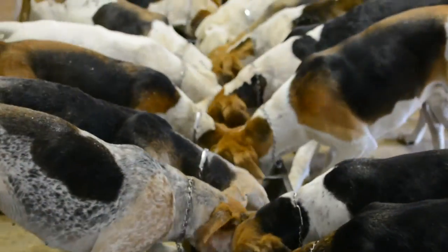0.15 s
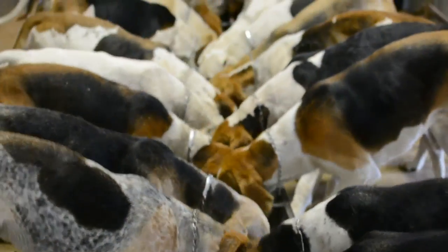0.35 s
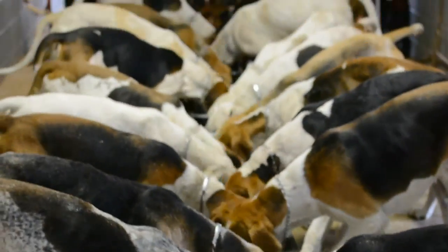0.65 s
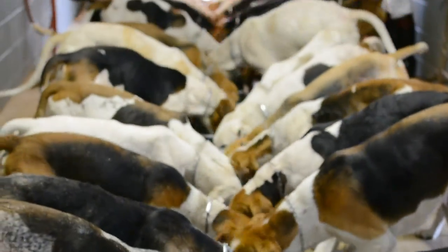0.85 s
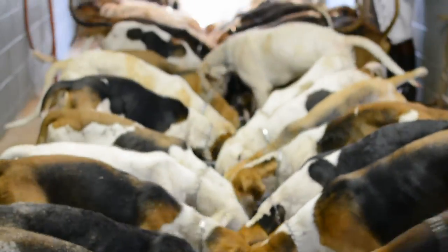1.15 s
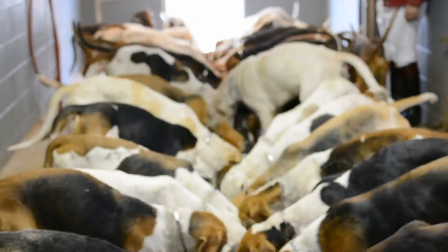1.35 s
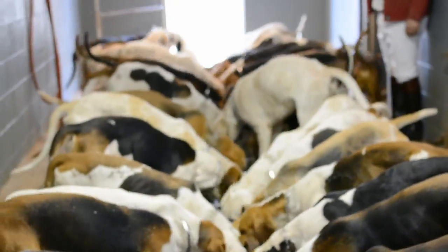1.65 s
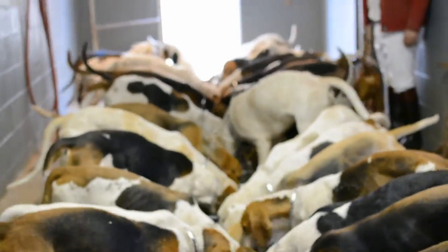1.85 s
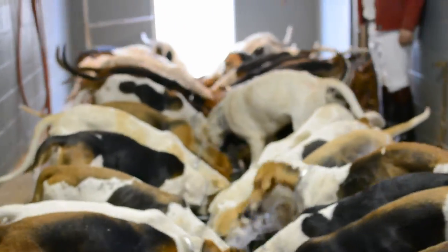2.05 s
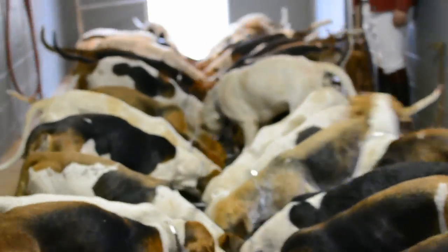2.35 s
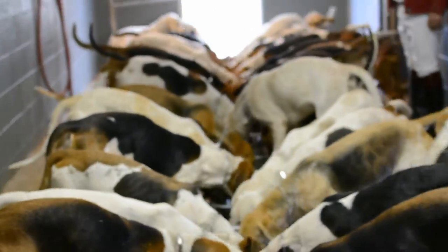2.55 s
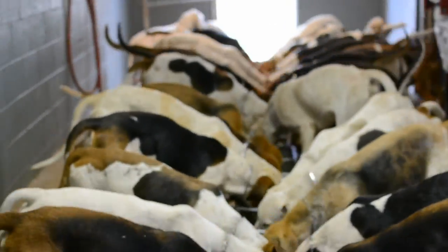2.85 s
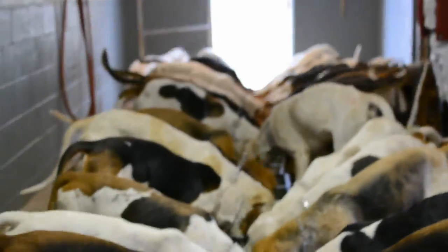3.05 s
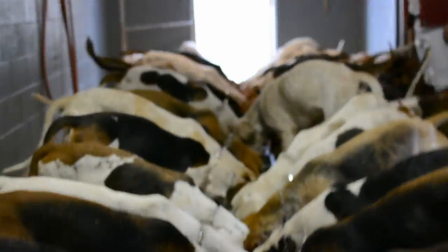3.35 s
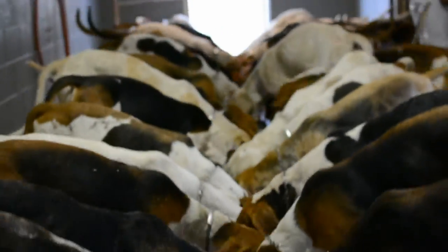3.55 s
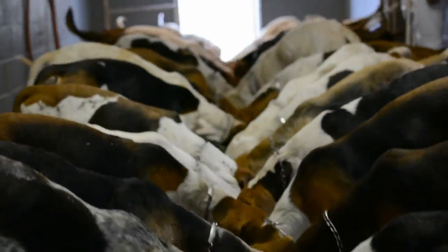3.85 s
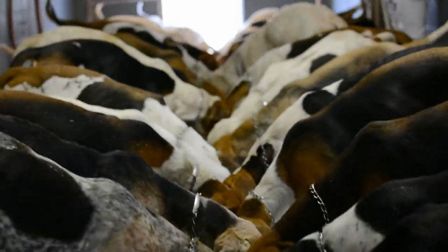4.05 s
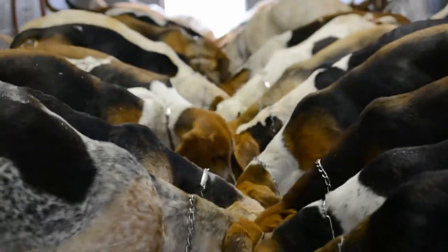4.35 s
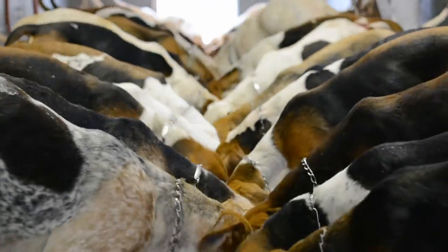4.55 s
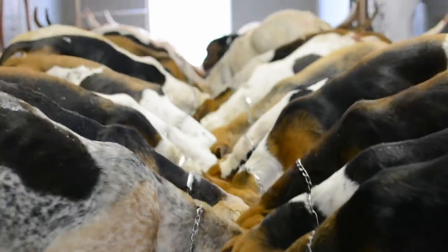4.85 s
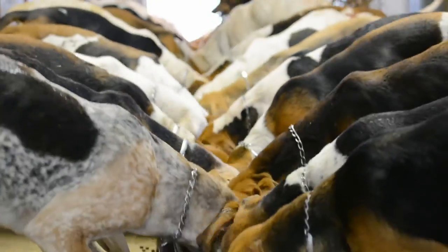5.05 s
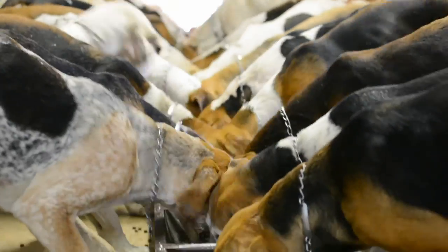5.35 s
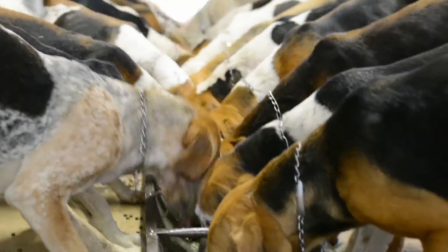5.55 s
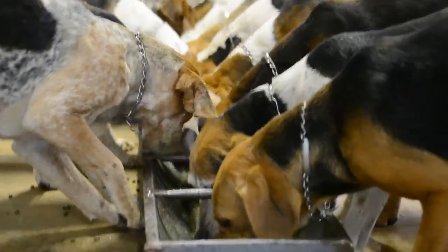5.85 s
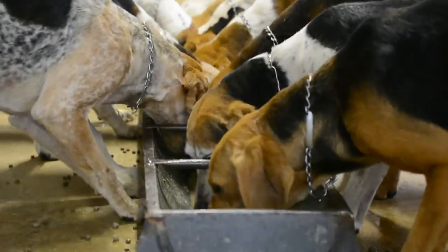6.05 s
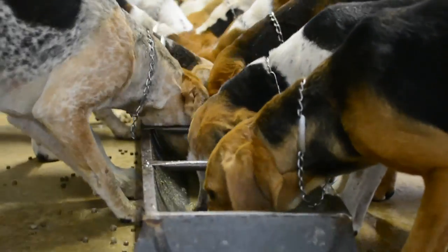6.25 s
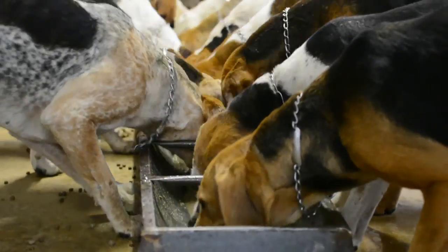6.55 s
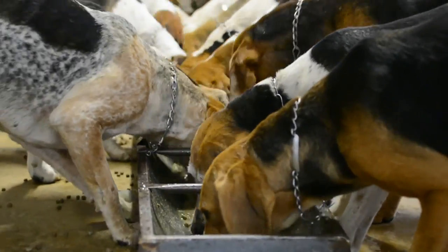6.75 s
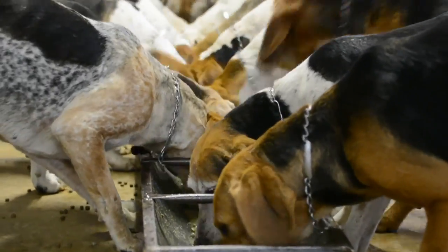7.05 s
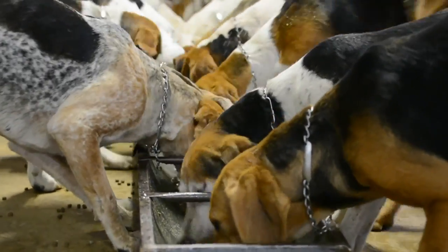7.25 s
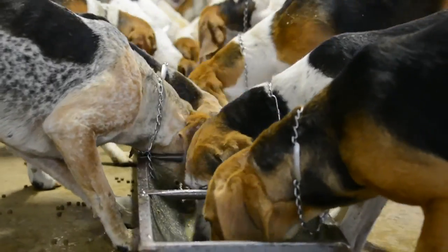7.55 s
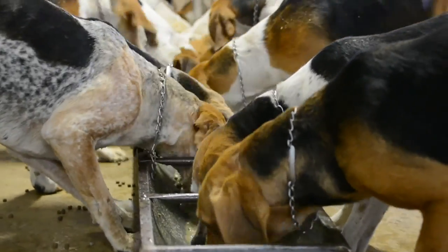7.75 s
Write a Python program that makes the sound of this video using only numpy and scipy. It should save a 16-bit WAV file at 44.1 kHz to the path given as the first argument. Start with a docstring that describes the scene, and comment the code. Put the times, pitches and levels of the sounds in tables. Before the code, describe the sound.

Many dogs crunch dry pellets in a dense, crackling bed, with teeth and chains ticking on a metal trough. Four rounds of short overlapping howls and hoarse bays rise over it, echoing off bare walls. The microphone's automatic gain pushes the feeding down under each round, then lets it climb back as the echo fades.

```python
"""Hounds feeding and howling

A pack of hounds crunches dry food from a metal trough in a bare, echoing kennel; the food is shaped noise.
Five hounds howl over each other in four rounds, each voice a stack of harmonics on a trembling pitch.
Others bay hoarsely or grunt (rough pulses), a squeak whistles, teeth and chains clatter (grit and ringing metal).
The recorder's gain control ducks under each round of howls and lets the feeding climb back as the echo fades."""
import sys
import numpy as np
from scipy import signal
from scipy.fft import rfft, irfft
from scipy.io import wavfile
from scipy.ndimage import uniform_filter1d, map_coordinates

SR = 44100
rng = np.random.default_rng(int(sys.argv[2]) if len(sys.argv) > 2 else 0)


def boost_factor(decibels):
    """Convert a level in decibels to a linear amplitude factor."""
    exponent = np.asarray(decibels, float) / 20
    return 10 ** exponent


def dump_mix(stems):
    """Bounce the given channels to the path in sys.argv[1] as a 16-bit WAV at rate SR."""
    frames = np.atleast_2d(stems).T  # one column per channel
    limited = np.clip(frames, -1, 1)  # hard clip at full scale
    pcm = np.round(limited * 32767).astype(np.int16)
    wavfile.write(sys.argv[1], SR, pcm)


N = 347949
T = np.arange(N) / SR


def unit(x):
    """Scale a signal to an rms of 1."""
    return x / np.sqrt(np.mean(x ** 2))


def walk(rate):
    """A smooth chance curve with a spread near 1: random levels held for 1 / rate s, then averaged twice."""
    hold = max(int(SR / rate), 2)
    steps = np.repeat(rng.standard_normal(N // hold + 1), hold)
    return 1.3 * uniform_filter1d(uniform_filter1d(steps, hold), hold)[:N]


def band(x, hz, width):
    """A two-pole resonance that lets its centre through at gain 1."""
    return signal.lfilter(*signal.iirpeak(hz, hz / width, fs=SR), x)


def colour(x, points):
    """Filter a signal through (f/Hz, gain/dB) points, then scale its rms to 1."""
    hz, db = np.transpose(points)
    f = np.fft.rfftfreq(N, 1 / SR) + 1
    gain = boost_factor(np.interp(np.log(f), np.log(hz), db))
    return unit(irfft(rfft(x) * gain, N))


def pan(x, db):
    """Make the left channel db louder than the right."""
    return x * boost_factor(np.array([[db], [-db]]) / 2)


def ring(modes, detune=0):
    """Struck metal: half a second of fading tones with chance phases, each a little off pitch if detuned."""
    t = T[:SR // 2]
    out = np.zeros(len(t))
    for hz, db, t60 in modes:
        cycles = hz * (1 + detune * rng.standard_normal()) * t + rng.random()
        out += boost_factor(db - 60 * t / t60) * np.sin(2 * np.pi * cycles)
    return out


def room(x, tail_s):
    """Bare walls: a fading noise tail, partly different for each ear, with treble that dies sooner."""
    treble_t60_s, split_hz, build_up_s = 0.53, 1630, 0.011
    t = T[:2 * SR]
    noise = rng.standard_normal((2, len(t))) + 0.97 * rng.standard_normal(len(t))
    low = signal.lfilter(*signal.butter(2, split_hz, fs=SR), noise)
    high = signal.lfilter(*signal.butter(1, 3000, fs=SR), noise - low)
    tail = low * boost_factor(-60 * t / tail_s) + high * boost_factor(-60 * t / min(tail_s, treble_t60_s))
    tail = tail * np.minimum(t / build_up_s, 1)
    tail = tail / np.sqrt(np.sum(tail ** 2, axis=1, keepdims=True))
    return signal.fftconvolve(x[None], tail, axes=1)[:, :N]


def bursts(per_s, spread_db, most, shape, hz, width):
    """Noise bursts at chance moments and chance strengths, heard through one resonance."""
    strength = boost_factor(spread_db * np.minimum(rng.exponential(size=N), most))
    hits = (rng.random(N) < per_s / SR) * strength
    envelope = signal.fftconvolve(hits, shape)[:N]
    return band(envelope * rng.standard_normal(N), hz, width)


# tone of the crunching, as a filter curve: (f/Hz, gain/dB)
CRUNCH_TONE = [(30, -46.5), (62, -29.5), (110, -14.5), (194, -4), (344, -3), (413, -0.5), (569, 0.5),
               (767, 0), (965, -1.5), (1430, -5.5), (2310, -12), (5530, -15), (9590, -26.5), (14500, -40)]


def feeding():
    """Many jaws: a noise bed with flickering treble, studded with pellet cracks, duller snaps and thuds."""
    short, longer = T[:1500], T[:3000]
    crack_shape = boost_factor(-60 * short / 0.15) * np.minimum(short / 0.0045, 1)
    layers = []
    for share in (1, 0.7, 0.7):  # common to both ears, then each ear's own
        cracks = bursts(260, 6, 3.2, crack_shape, 7750, 6100)
        snaps = bursts(120, 2.9, 3.2, boost_factor(-60 * short / 0.033), 1500, 850)
        thuds = bursts(45, 3.4, 3, boost_factor(-60 * longer / 0.059), 534, 450)
        bed = rng.standard_normal(N)
        high = signal.lfilter(*signal.butter(2, 2600, "high", fs=SR), bed)
        mix = bed - high + high * boost_factor(2.5 * walk(25))
        mix += 1.09 * unit(cracks) + 0.27 * unit(snaps) + 0.23 * unit(thuds)
        layers.append(share * colour(mix, CRUNCH_TONE))
    own = np.array(layers[1:])
    own_top = signal.lfilter(*signal.butter(2, 7500, "high", fs=SR), own)
    return layers[0] + own + 1.1 * own_top  # the ears differ most in the top treble


# level of the feeding noise over time: (t/s, crunching treble and body level/dB, low shuffle level/dB)
FEED_LEVELS = [(0, -2, -1), (.6, 6.5, 8), (1.2, -2, -5), (1.7, -1, -5), (2.201, 0, 1.5), (2.55, -5, -2.5),
               (2.8, -17.5, 0), (2.95, -0.5, -8.5), (3.5, 2, 7), (4.2, 3.5, 5), (4.7, -3, -8),
               (5.2, 3, 0.5), (5.65, 0, 4), (6.1, -2.5, -8.5), (6.6, -1, -2), (7.1, 1.5, 3.5), (7.5, 0, 1),
               (7.89, 3, 2)]


def feeding_levels():
    """The feeding noise in three bands (crunching treble, its body, low shuffle), each with a moving level."""
    treble_db, body_db, shuffle_db = -18, -14.5, -11.5
    feed = feeding()
    low = signal.sosfilt(signal.butter(2, 380, fs=SR, output="sos"), feed)
    high = signal.sosfilt(signal.butter(2, 2400, "high", fs=SR, output="sos"), feed)
    s, crunch_move_db, low_move_db = np.transpose(FEED_LEVELS)
    crunch_move_db, low_move_db = np.interp(T, s, crunch_move_db), np.interp(T, s, low_move_db)
    treble = boost_factor(treble_db + crunch_move_db + 2 * walk(13)) * high
    body = boost_factor(body_db + crunch_move_db + 0.86 * walk(11)) * (feed - low - high)
    shuffle = boost_factor(shuffle_db + low_move_db + 1.3 * walk(9)) * low
    return treble + body + shuffle


# knocks of teeth and chains on the trough: (t/s, relative level/dB, grit centre f/Hz)
KNOCKS = [(0.321, -19.5, 5200), (.415, -13.5, 4980), (0.4968, -17.5, 5150), (0.578, -9.5, 5420),
          (1.885, -16, 5300), (1.973, -15, 5350), (2.1433, -16, 5100), (2.2414, -9, 5250),
          (2.8636, -10.5, 6430), (2.9656, -3, 6100), (3.075, -15, 5630), (3.285, -11.5, 5520),
          (3.446, -15.5, 5150), (3.522, -12.5, 6200), (3.61, -9, 5700), (3.912, -5.5, 4820),
          (4.2238, -15, 5120), (4.278, -12, 4850), (4.789, -9.5, 5140), (5.108, -15, 6130),
          (5.375, -13.5, 6240), (5.403, -12.5, 4120), (5.57, -15, 5330), (5.611, -16.5, 5900),
          (5.648, -19.5, 6740), (6.194, -10.5, 5600), (6.48, -10, 5430), (6.641, -14.5, 5200),
          (6.952, -10, 2340), (7.0606, -4, 3420), (7.091, -4, 6030), (7.1273, 1, 3070), (7.148, -5.5, 6100),
          (7.322, -13, 7970), (7.5252, -9.5, 5830), (7.687, -12.5, 1730), (7.7521, -6.5, 5570)]
# ringing tones of the metal trough: (f/Hz, level/dB, time to fade by 60 dB t/s)
TROUGH_TONES = [(2503, 7.5, 0.089), (2705, -3.5, 0.086), (4080, -17, 0.028), (4670, -9, .04),
                (6300, 21, 0.031), (6850, 13, 0.047)]
# ringing tones of a chain link: (f/Hz, level/dB, time to fade by 60 dB t/s)
CHAIN_TONES = [(4670, 0.5, 0.59), (4670, -4, .2), (8950, 3, .25), (8830, -11, .12)]


def clatter():
    """Each knock is a burst of gritty noise and a ring of the trough; one chain link chimes."""
    rise_s = 0.012  # pellets slide before they strike
    chain_s, chain_db = 7.32, -23.5
    out = np.zeros(N + SR)
    t = T[:SR // 2]
    for s, db, hz in KNOCKS:
        grit = band(rng.standard_normal(len(t)), hz, 0.6 * hz) * boost_factor(-60 * t / 0.16)
        knock = 1.35 * grit + 0.12 * ring(TROUGH_TONES, detune=0.028)
        i = int(s * SR)
        out[i:i + len(t)] += boost_factor(db) * knock * np.minimum(t / rise_s, 1)
    i = int(chain_s * SR)
    out[i:i + len(t)] += boost_factor(chain_db) * ring(CHAIN_TONES)
    return out[:N]


# thin squeak: (t/s, length t/s, first f/Hz, last f/Hz, relative level/dB)
SQUEAKS = [(3.206, 0.0563, 3430, 3200, -25.5)]


def squeaks():
    """A near-pure whistle: one sine whose pitch wavers and whose strength flutters."""
    edge_s = 0.0081
    out, shake = np.zeros(N), 1 + 0.0051 * walk(140)
    for s, length, first_hz, last_hz, db in SQUEAKS:
        on = slice(int(s * SR), int((s + length) * SR))
        t = T[on] - s
        hz = first_hz + (last_hz - first_hz) * t / length
        phase = 2 * np.pi * np.cumsum(hz * shake[on]) / SR
        edge = np.clip(np.minimum(t, length - t) / edge_s, 0, 1)
        out[on] += boost_factor(db) * edge * np.sin(phase)
    return out * (1 + 0.5 * walk(77))


def hoarse(calls):
    """Unsteady pulses of the vocal folds mixed with gated breath, through throat and mouth resonances."""
    rough, sag_per_s = 0.45, 0.18  # share of breath noise; share of pitch lost per second
    out, shake, air = np.zeros(N), walk(150), rng.standard_normal(N)
    no_bass = signal.butter(4, 170, "high", fs=SR, output="sos")  # a dog's head radiates little below this
    for s, length, first_hz, db, mouth_hz in calls:
        on = slice(int(s * SR), min(int((s + length) * SR), N))
        u = np.linspace(0, 1, on.stop - on.start)
        last_hz = first_hz * (1 - sag_per_s * length)
        hz = (first_hz + (last_hz - first_hz) * u) * (1 + 0.17 * rough * shake[on])
        phase = np.cumsum(hz) / SR % 1
        source = np.exp(-phase / 0.034) * (1 - rough + 2 * rough * air[on])
        mouth = band(band(source, mouth_hz, 0.41 * mouth_hz), mouth_hz, 0.41 * mouth_hz)
        throat = band(band(source, max((first_hz + last_hz) / 2, 400), 220), 790, 200)
        voice = unit(signal.sosfilt(no_bass, mouth + 1.37 * throat))
        out[on] += boost_factor(db) * voice * np.minimum(u / 0.043, 1) * (1 - u ** 3)
    return out


# grunts close by: (t/s, length t/s, starting pitch f/Hz, relative level/dB, mouth resonance f/Hz)
GRUNTS = [(3.625, 0.21, 423, -11, 438), (3.85, 0.16, 469.3, -13.5, 474), (4.065, 0.12, 104.4, -10.5, 300),
          (4.17, 0.069, 100.7, -16.5, 277), (7.579, 0.2, 192, -25.5, 366), (7.847, 0.093, 189, -16, 402)]


def grunts():
    """Short hoarse calls; the scene gives them less echo than the bays."""
    return hoarse(GRUNTS)


# hoarse bays: (t/s, length t/s, starting pitch f/Hz, relative level/dB, mouth resonance f/Hz)
HOARSE_BAYS = [(0.811, 0.28, 457, -14.5, 1460), (1.466, 0.18, 618.8, -5, 1620), (2.405, 0.19, 481, -8, 950),
               (2.87, 0.22, 498.6, -9, 1410), (3.138, 0.43, 118, -33, 296),
               (4.773, 0.57, 451.7, -13.5, 900), (5.077, 0.42, 501.6, -8.5, 1460),
               (5.921, 0.45, 497, -7, 1830)]


def hoarse_bays():
    """Rough baying, from the same pulses and breath as the grunts."""
    return hoarse(HOARSE_BAYS)


def howl(calls, mouth, overtones, phrasing, closing_db, tremor, flutter):
    """Harmonics on a trembling pitch that scoops up and glides; uneven vocal folds make the strength flutter."""
    breath_db, breath_hz = -32, 2040  # air that rushes with every howl
    throb_per_s, throb_db = 7.1, 0.5  # a held howl swells and sags with the breath
    broken_db = 5  # the overtones come and go
    out, shake = np.zeros(N), 1 + tremor * (walk(30) + 1.59 * walk(140))
    air = boost_factor(breath_db) * unit(band(rng.standard_normal(N), breath_hz, 1900))
    flicker = [walk(25) for _ in range(3)]
    scoop, scoop_s, mid_s, glide_s, close_s, attack_s, swell_db, release_s, droop = phrasing
    for s, length, first_hz, last_hz, level_db in calls:
        on = slice(int(s * SR), int((s + length) * SR))
        t = T[on] - s
        glide = (1 + np.tanh((t - mid_s) / glide_s)) / 2
        hz = (first_hz + (last_hz - first_hz) * glide) * (1 - scoop * np.exp(-t / scoop_s))
        fade = np.clip((length - t) / release_s, 0, 1)
        phase = 2 * np.pi * np.cumsum(hz * (1 - droop * (1 - fade)) * shake[on]) / SR
        still_open = np.exp(-(t / close_s) ** 2)
        db = [shut + (wide - shut) * still_open for wide, shut in zip(*mouth)]
        for j, wide in enumerate(overtones):
            db.append(wide + closing_db * (1 - still_open) + broken_db * flicker[j % 3][on])
        tones = sum(boost_factor(d) * np.sin((k + 1) * phase) for k, d in enumerate(db))
        throb = throb_db * np.cos(2 * np.pi * throb_per_s * (t - attack_s))
        edge = np.clip(t / attack_s, 0, 1) ** 2 * fade * boost_factor(level_db + swell_db * t - throb)
        out[on] += np.sqrt(2) * edge * (air[on] + tones)
    return out * (1 + flutter * walk(90))


# Howls of each hound: (t/s, length t/s, pitch before the glide f/Hz, pitch after it f/Hz, relative level/dB)
# a wide-mouthed hound that opens most rounds: the second harmonic leads once the mouth has closed down
LEADER = [(0.679, 0.17, 565.2, 524.1, 19.5), (2.338, 0.18, 563.7, 540, 15), (4.284, 0.23, 559.8, 536.2, 16),
          (5.99, 0.24, 541.9, 521.6, 15)]
# a round-mouthed hound that answers: the fundamental leads
ANSWER = [(0.81, 0.33, 586, 561.4, 6.4), (2.4, 0.57, 577.8, 563.2, 6.53), (4.39, 0.44, 595.2, 578, 6.75),
          (4.9, 0.18, 554, 537.8, 3.4), (5.76, 0.15, 584, 560.7, 2.2), (6.2, 0.14, 591.6, 576, 1.2)]
# a third hound that opens the last round
LATE = [(5.685, 0.28, 571.6, 549.8, 12.1)]
# a fourth hound whose overtones grow within each call; its longest call climbs
RISER = [(.995, 0.16, 514, 512, 1.3), (1.12, 0.371, 486.7, 514.7, 9.05), (4.831, 0.13, 488.3, 477, 4.6),
         (5.89, 0.22, 489, 468, 0.79)]
# a fifth hound with the shakiest pitch and mostly long calls
SLIDER = [(1.47, .4, 629.5, 490.2, -3.5), (2.88, 0.49, 488, 513.6, -5.5), (4.78, .25, 453, 438, -17.5),
          (5.08, 0.436, 521, 447, -6)]
# each voice: relative level/dB of harmonics 1, 2, 3, 4 at the start of a call, then once the mouth has closed
MOUTHS = [((-37, 0, -50.5, 2.5), (-24.5, -1.5, -13, -15)), ((-5, -11, -19, -34.5), (1, -6, -23.5, -24.5)),
          ((-18, 0.031, -17.5, -8.5), (-13, 0.019, -14, -25)), ((-52, 0.03, -23.5, -15.5),
          (-22.5, 0.03, -33.5, -7)), ((-0.92, -11, -14, -24), (-1.5, -6.5, -11, -18.5))]
# each voice: relative level/dB of the harmonics from 5 up (to 14 at most) at the start of a call
OVERTONES = [(-32.5, -27, -44.5, -29.5, -54, -42, -55.5, -43, -53.5, -44),
             (-55, -36.5, -52.5, -52, -39, -47.5, -43, -53.5, -37, -61),
             (-30, -27, -37, -45, -44, -31.5, -40, -38.5, -46, -42),
             (-60, -42.5, -61, -39.5, -57, -48.5, -65, -49, -64, -47), (-24, -39, -40)]
# each voice: (scoop up from this share below, scoop t/s, middle of the glide t/s, glide t/s, mouth closes t/s,
# attack t/s, swell in dB per s, release t/s, share of pitch lost in the release)
PHRASING = [(0.0798, 0.0296, .095, 0.014, 0.059, 0.069, -30.5, 0.035, 0.023),
            (0.0207, 0.024, .17, 0.065, 0.11, 0.02, 1.5, 0.0472, 0.098),
            (0.0067, 0.011, 0.144, 0.092, 0.3, 0.084, -4.5, 0.061, 0.012),
            (0.0032, 0.017, .19, 0.015, 0.18, 0.016, 3, 0.055, 0.023),
            (.02, 0.018, .14, 0.0699, 0.055, 0.021, -17.5, 0.071, 0.022)]
# each voice: (overtone change as the mouth closes level/dB, pitch tremor depth, flutter depth,
# left minus right level/dB, direct sound level/dB)
VOICES = [(-6, 0.0051, 0.74, -1, -4.5), (-3, 0.0036, 0.46, -4, 0.5), (-11, 0.0064, 0.72, -0.5, -3.5),
          (14.5, 0.0038, 0.41, -2, -3.5), (-3, 0.0119, 0.45, -2, -3)]


def howling_pack():
    """Five howling hounds: their direct sound in stereo, and their plain sum to feed the echo."""
    near, total = np.zeros((2, N)), np.zeros(N)
    hounds = (LEADER, ANSWER, LATE, RISER, SLIDER)
    for calls, mouth, overtones, phrasing, voice in zip(hounds, MOUTHS, OVERTONES, PHRASING, VOICES):
        closing_db, tremor, flutter, side_db, direct_db = voice
        sound = howl(calls, mouth, overtones, phrasing, closing_db, tremor, flutter)
        near += pan(sound, side_db) * boost_factor(direct_db)
        total += sound
    return near, total


def swaying_echo(x):
    """The kennel's echo; moving bodies keep changing its paths, so its delay wanders slightly."""
    sway_s, sways_per_s = 0.0004, 9
    echo = room(x, 1.546)
    when = (T + sway_s * walk(sways_per_s)) * SR
    return np.array([map_coordinates(ear, [when], mode="nearest") for ear in echo])


def scene():
    """Place the feeding, the voices and the clatter in the kennel."""
    feed = feeding_levels()
    knocks = clatter() + squeaks()
    grunting, baying = grunts(), hoarse_bays()
    near, howls = howling_pack()
    echo = swaying_echo(howls + 1.72 * baying + 0.61 * grunting)
    mix = pan(feed, -2.5) + 1.5 * pan(knocks, -1) + boost_factor(1) * room(knocks, 0.68)
    mix += 0.92 * pan(baying + grunting, -0.91)
    return mix + near + boost_factor(-5.5) * pan(echo, -3.16)


def gain_control(x, size=64):
    """Follow the power of both channels, quick up and slower down, and squeeze what lies above the top level."""
    top_db, ratio, range_db = -22, 5.55, 29.5
    attack_s, release_s = 0.012, 0.07
    power = uniform_filter1d(np.mean(x ** 2, axis=0), size=4 * size)[::size]
    heard, e = np.empty(len(power)), np.mean(power[:size])
    for i, p in enumerate(power):
        e += (p - e) * size / SR / (attack_s if p > e else release_s)
        heard[i] = e
    over_db = np.maximum(10 * np.log10(heard) - top_db, 0)
    cut_db = np.minimum(over_db * (1 - 1 / ratio), range_db)
    return x * boost_factor(np.interp(T, T[::size], -cut_db))


def low_pass(x):
    """Removes everything above the highest recorded frequency."""
    return signal.sosfilt(signal.butter(12, 15820, fs=SR, output="sos"), x)


def record(dry):
    """Gain control, a right port that hears everything a moment later, rounded peaks and a deep bass cut."""
    port_lag = 1.15  # samples
    x = gain_control(dry)
    f = np.fft.rfftfreq(N)
    late = irfft(rfft(x[1]) * np.exp(-2j * np.pi * f * port_lag), N)
    x = np.tanh(1.02 * np.array([x[0], late])) / 0.95
    x = signal.sosfilt(signal.butter(2, 55, "high", fs=SR, output="sos"), x)
    return low_pass(x)


dry = scene()
out = record(dry)
dump_mix(out)
```